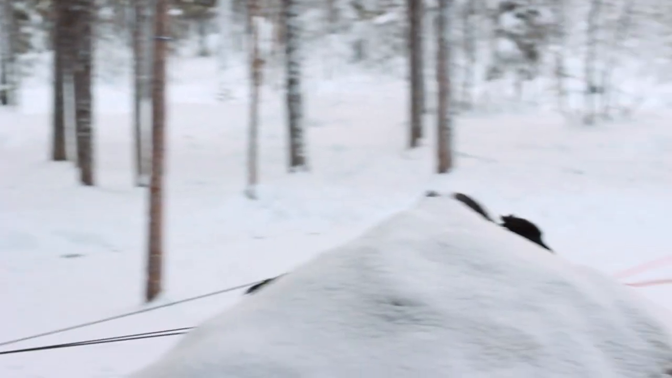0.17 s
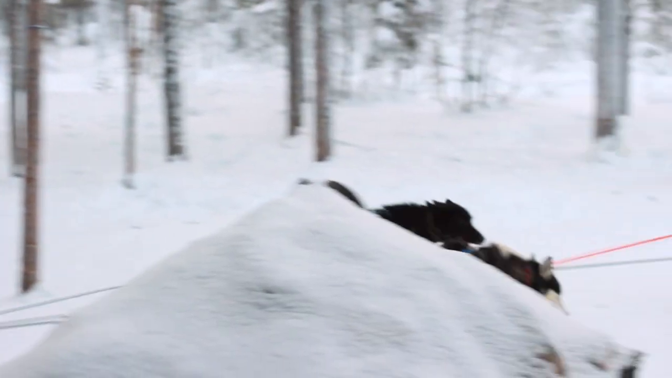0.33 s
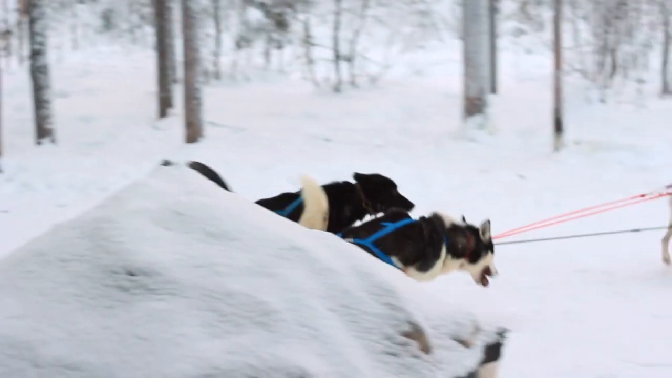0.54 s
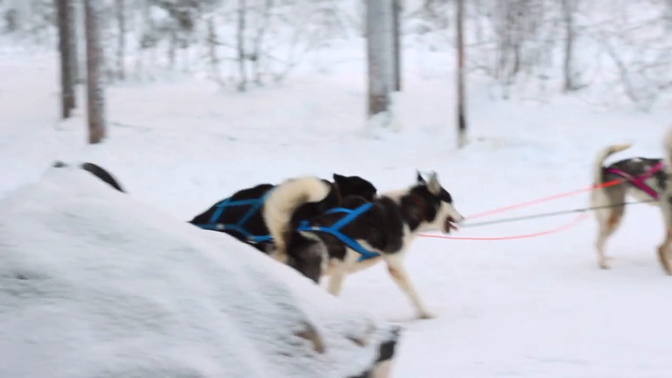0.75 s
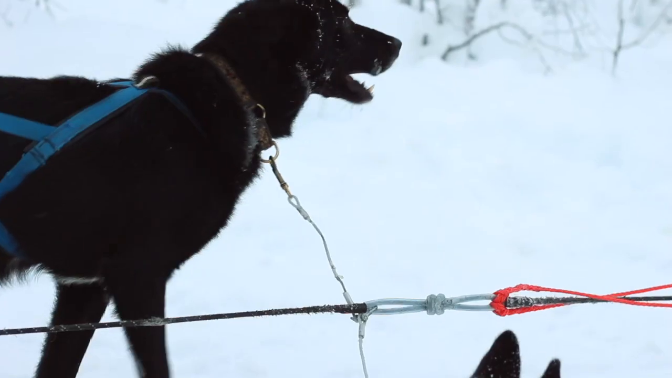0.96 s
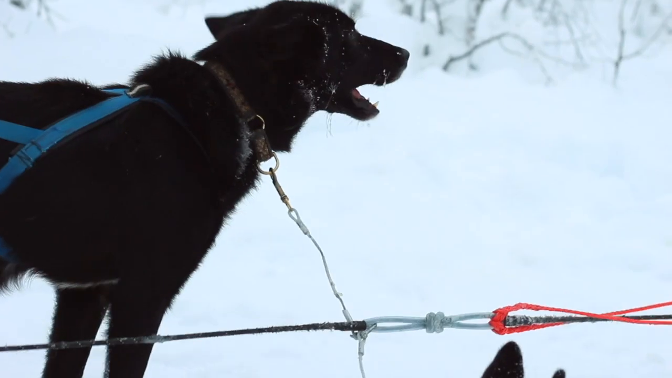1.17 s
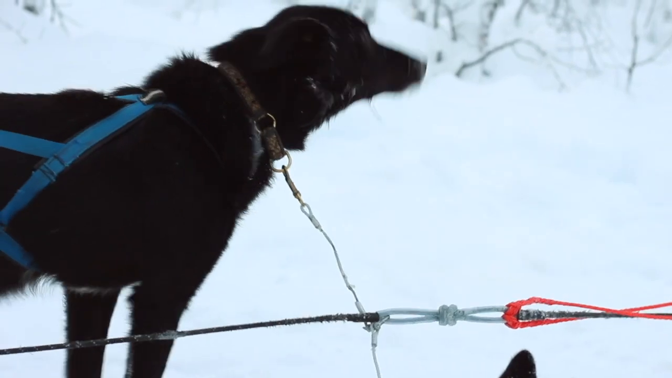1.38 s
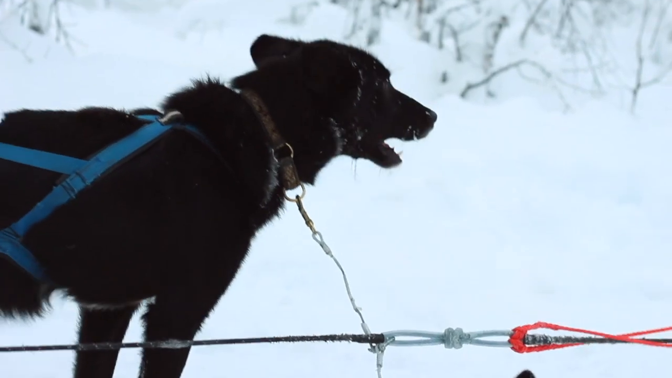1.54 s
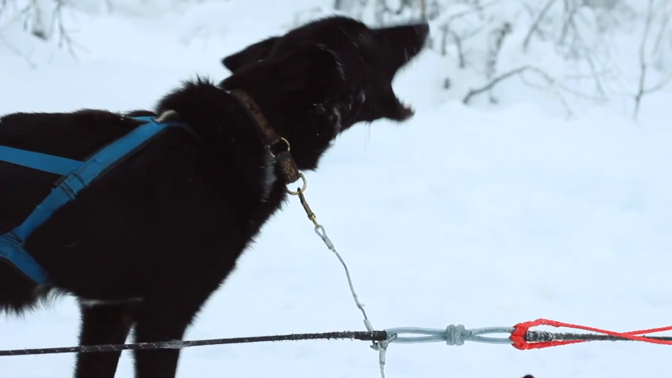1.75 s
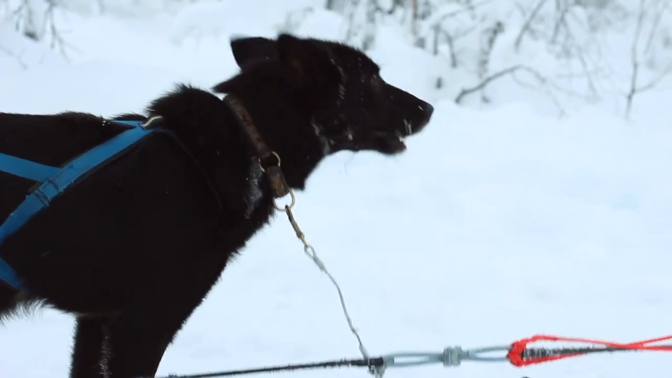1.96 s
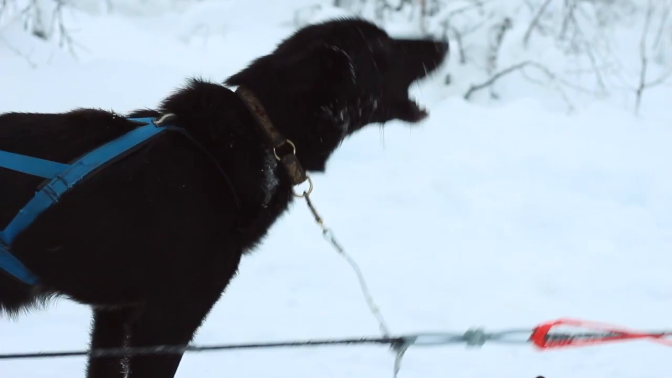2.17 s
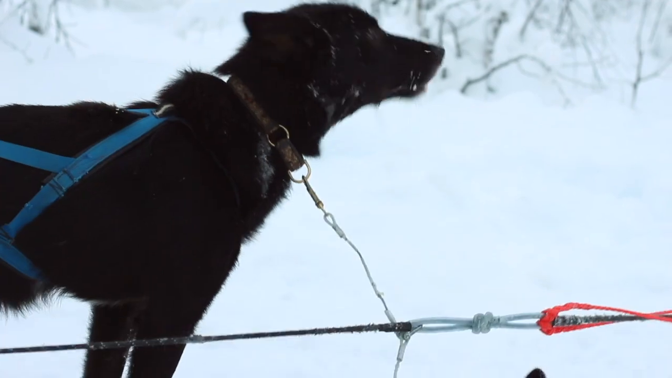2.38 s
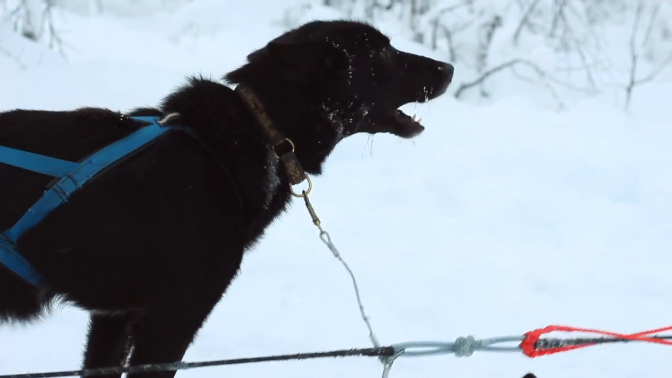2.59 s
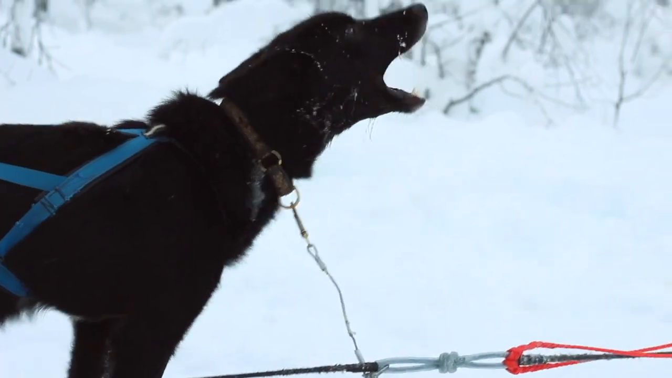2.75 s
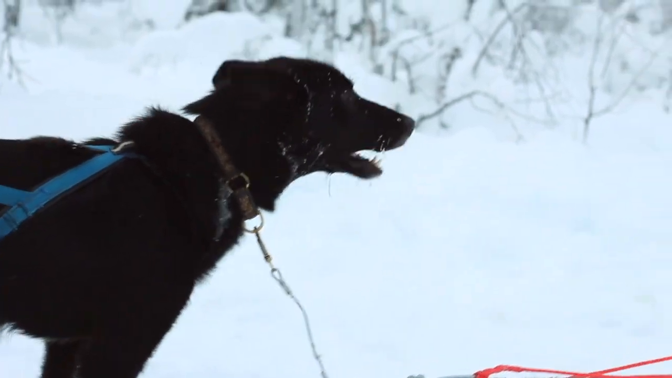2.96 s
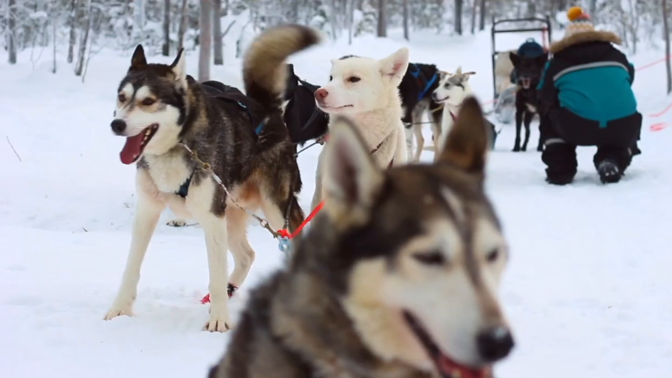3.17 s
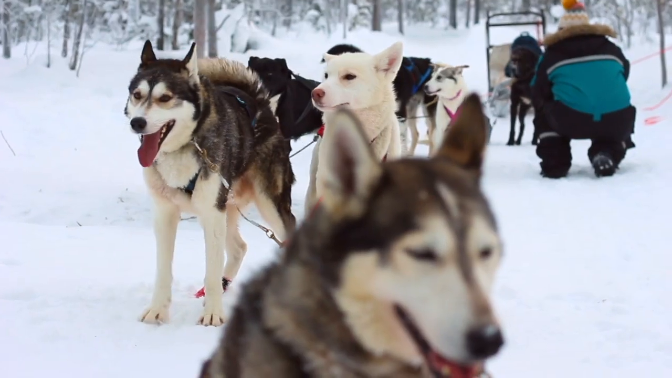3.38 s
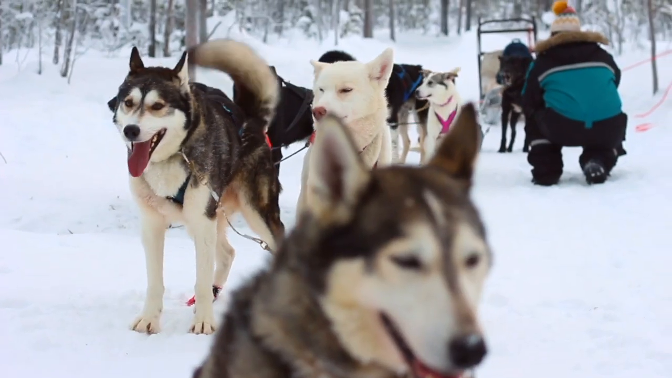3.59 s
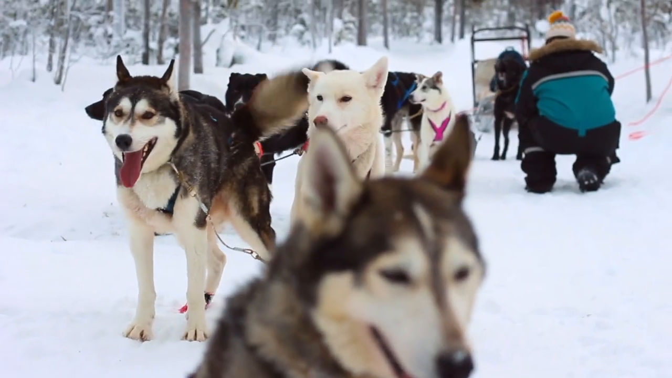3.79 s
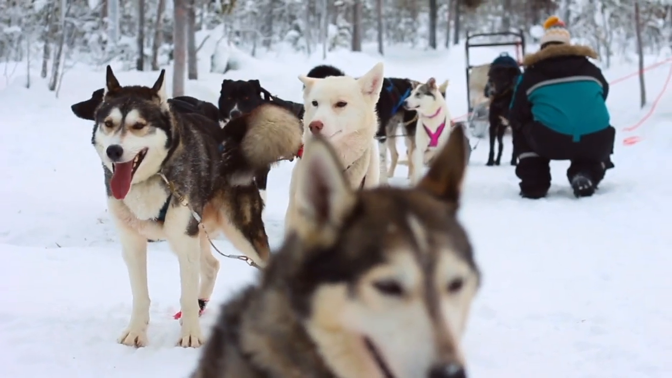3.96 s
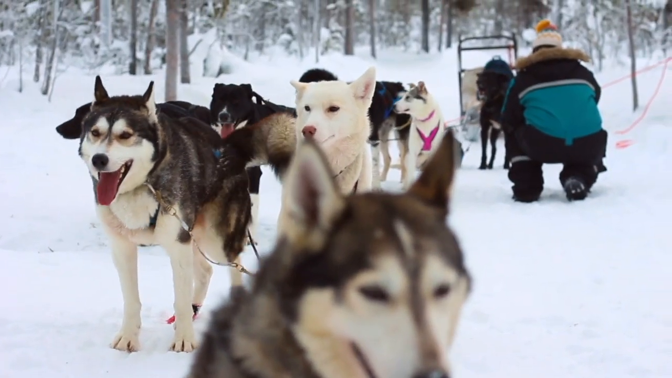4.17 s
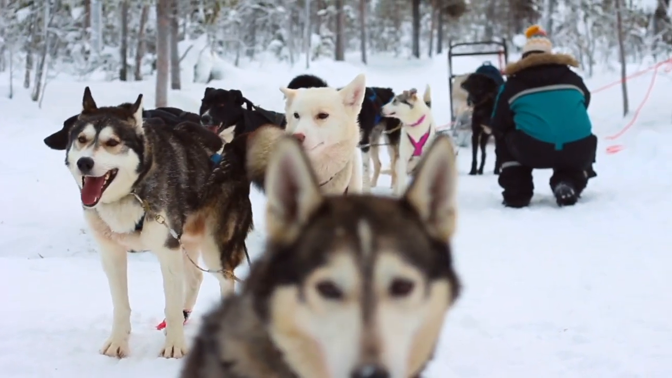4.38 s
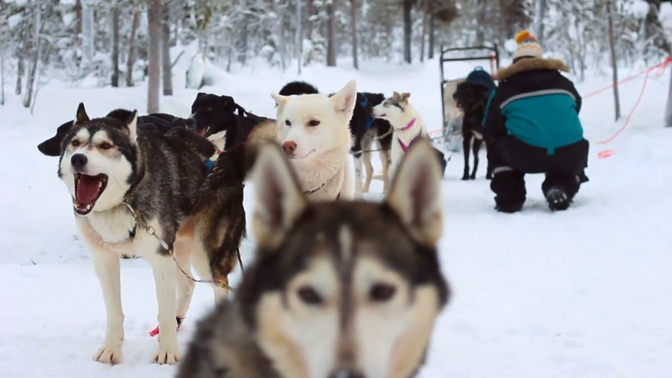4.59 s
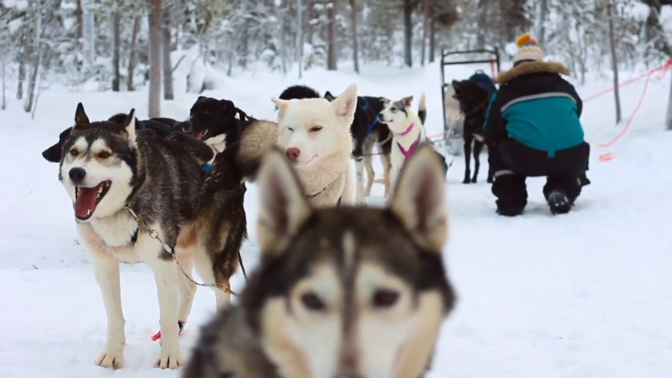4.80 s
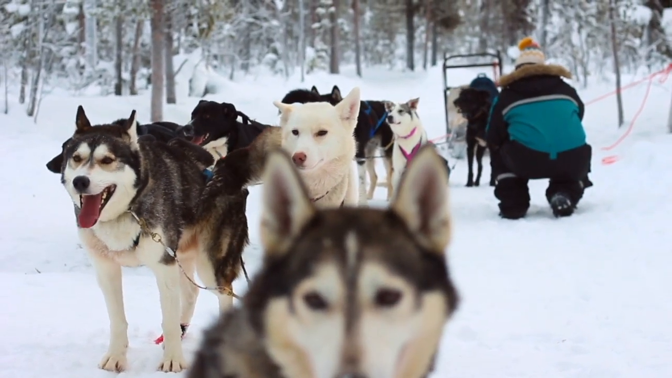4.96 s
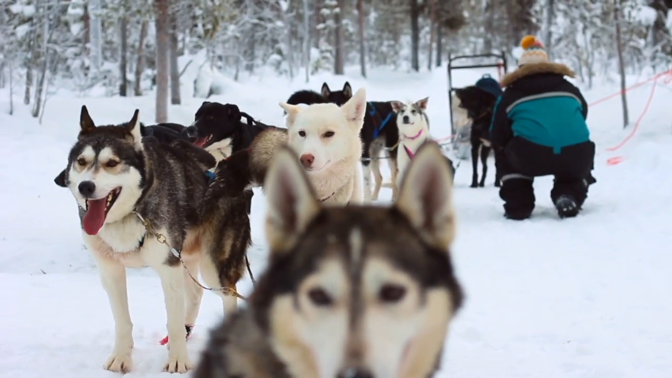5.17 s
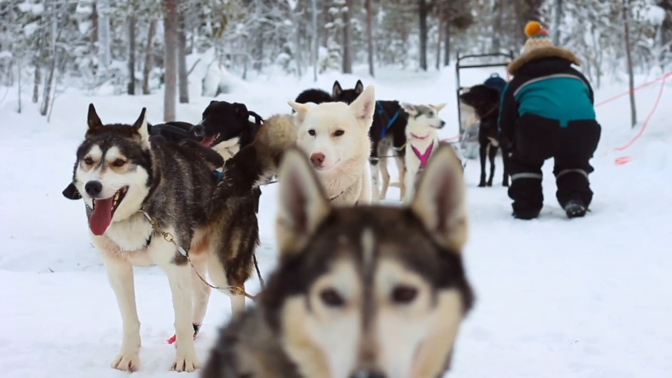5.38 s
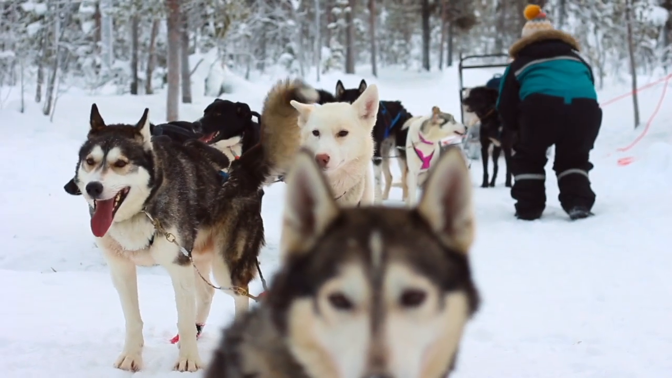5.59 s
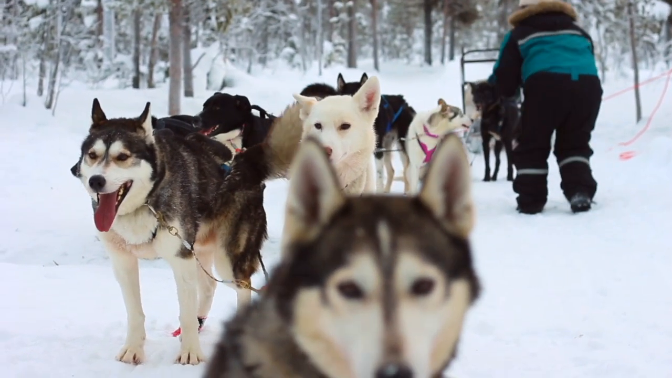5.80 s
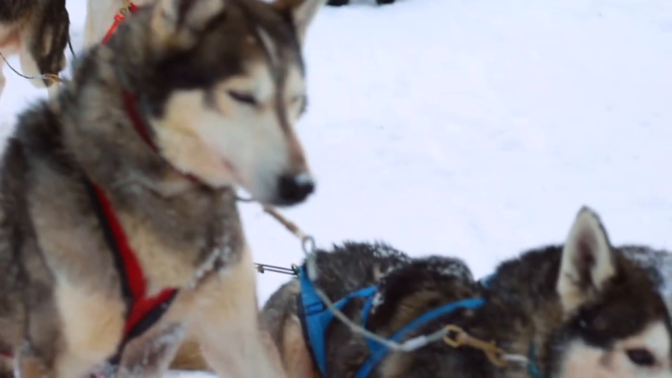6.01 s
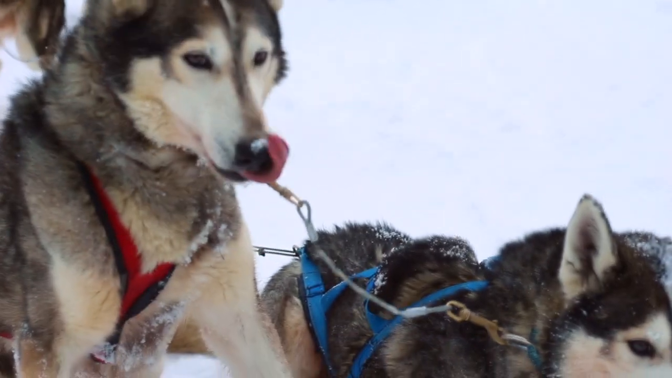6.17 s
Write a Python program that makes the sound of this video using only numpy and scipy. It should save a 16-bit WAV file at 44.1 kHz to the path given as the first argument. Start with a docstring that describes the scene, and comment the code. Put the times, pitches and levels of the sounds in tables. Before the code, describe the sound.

A sled dog barks loudly up close, then a hoarser dog barks farther off, with yips and thin whines outdoors in the snow.

```python
"""First come distant barks and thin whines, as a team of sled dogs trots past on crunching snow.
Then a black dog barks close by, and a hoarse dog down the line follows, with a yip and a yelp.
Each bark starts as slow throat creaks that speed up, then becomes a tone that rises and falls
as the jaw opens. Whines and panting fall between the barks, and the forest sends back a dull echo."""
import sys
import numpy as np
from scipy import signal
from scipy.fft import rfft, irfft
from scipy.io import wavfile
from scipy.ndimage import uniform_filter1d, map_coordinates

SR = 44100
rng = np.random.default_rng(int(sys.argv[2]) if len(sys.argv) > 2 else 0)


def transcribe(u):
    """Save the signal u as a 16-bit wav file named by the first command-line argument.

    u: samples, shape (n,) or (channels, n), limited to [-1, 1]; the rate is SR.
    q: integer samples, one column per channel.
    """
    v = np.clip(np.atleast_2d(u).T, -1, 1)
    q = np.round(v * 32767).astype(np.int16)
    wavfile.write(sys.argv[1], SR, q)


N = 275184
TIME = np.arange(N) / SR
TOP_HZ = 15750  # upper limit of the treble

# the black dog's barks (creak starts [s], jaw opens [s], voice ends [s], top pitch [Hz],
# creak against voice [dB], rasp against tone [dB], early voice break [0-1])
BLACK_BARKS = [(1.284, 1.336, 1.433, 603, -9.5, -14, 1.0), (1.768, 1.835, 1.913, 592, -10, -13.5, 0),
               (2.209, 2.278, 2.371, 602, -11, -15, .7), (2.69, 2.769, 2.868, 608, -12.5, -12.5, 0.08)]
# the hoarse dog's barks (creak starts [s], jaw opens [s], voice ends [s], surge peaks [s],
# creak against voice [dB], rasp against tone [dB])
HOARSE_BARKS = [(3.345, 3.377, 3.489, 3.446, -6, 4), (3.857, 3.884, 3.993, 3.948, -7, 4),
                (4.24, 4.342, 4.453, 4.382, -5, 11), (4.783, 4.812, 4.923, 4.872, -6, 5),
                (5.259, 5.289, 5.398, 5.346, -9, 4)]
# distant barks (creak starts [s], jaw opens [s], voice ends [s], top pitch [Hz], level [dB],
# rasp against tone [dB])
FAR_BARKS = [(0, .04, .1, 1080, -30, 0), (.08, .12, .25, 1010, -26.5, 7),
             (.596, .618, 0.74, 1000, -27.5, 7), (0.787, .81, 0.88, 1600, -45, 1),
             (0.913, 0.928, .968, 590, -27, 3), (0.964, 0.996, 1.05, 740, -35, 8),
             (3.205, 3.22, 3.275, 430, -53, 6), (3.29, 3.31, 3.35, 1350, -55, 0)]
# whines and squeals (time [s], length [s], starting pitch [Hz], glide [octaves], level [dB])
WHINES = [(.005, .05, 560, .1, -36), (.019, 0.058, 1210, 0.099, -37.5), (2.06, .17, 4150, .03, -72),
          (0.76, 0.041, 9900, -.25, -60.5), (1.108, .017, 790, -0.22, -46), (2.427, .074, 4300, -0.16, -71),
          (2.836, .15, 6500, -.08, -62.5), (3.041, 0.051, 5120, 0.042, -56),
          (4.329, 0.02, 6360, 0.0047, -44.5), (4.682, 0.042, 5780, 0.18, -33),
          (4.733, .048, 1130, 0.36, -38), (5.858, .018, 1205, 0.21, -45.5),
          (5.948, 0.074, 4580, -0.16, -57)]
# puffs of breath (time [s], level [dB])
PANTS = [(3.07, -59), (3.19, -60), (3.739, -60), (4.69, -40.5), (5.128, -67), (5.552, -60.5), (5.818, -54),
         (5.912, -52)]
# paws and sled runners come near and leave (nearest at [s], half length [s], level [dB])
TROTS = [(.55, .6, -53), (3.28, 0.25, -57)]
# single paws break the snow's crust (time [s], level [dB])
CRUNCHES = [(.264, -47), (.395, -52), (.73, -55)]
# moments when the whole sound dips briefly (time [s])
DIPS_S = [.962, 3.047, 5.884]

# how throat and mouth shape the sound, with the jaw closed or open (frequency [Hz], level [dB])
BLACK_CLOSED = [(60, -53), (250, -34), (400, -17.5), (570, 7), (720, -6.5), (1000, -7.5), (1300, -26),
                (1600, -10.5), (1900, -33), (2350, -18), (3000, -68), (6000, -56.5), (15000, -89)]
BLACK_OPEN = [(40, -42.5), (100, -27.5), (280, -7.5), (600, -0.5), (1000, -0.5), (1350, -3.5), (1900, -1),
              (2600, -12), (3200, -12), (4300, -17.5), (8000, -32), (15500, -47)]
HOARSE_CLOSED = [(80, -42), (400, -10.5), (560, -1), (750, -2.5), (1100, 0.5), (2300, -7), (3100, -34.5),
                 (5500, -30), (9000, -40.5), (15000, -73.5)]
HOARSE_OPEN = [(80, -61), (200, -32), (420, -22), (560, 5), (720, -0.5), (1500, -0.5), (2150, -7),
               (2600, -22.5), (3200, -32.5), (4300, -31.5), (4700, -38.5), (5300, -27), (6400, -42),
               (7000, -33), (8300, -48.5), (10000, -47), (15500, -60)]
FAR_THROAT = [(47, -68), (80, -38), (263, -25), (348, -19), (432, -26.5), (623, -2.5), (825, -10.5),
              (1070, -0.5), (1880, -15.5), (2330, -12.5), (5530, -38), (14000, -76)]
# where the hoarse dog's mouth rings (frequency [Hz])
MOUTH_RINGS_HZ = [2850, 3300, 4380, 5630, 9900]
# the mix of bass and treble in breath, snow and echo (frequency [Hz], level [dB])
PANT_COLOUR = [(150, -38), (570, -6), (1100, -7.5), (2200, -2), (4500, -20), (8300, -26.5), (12000, -48)]
SNOW_COLOUR = [(40, -51), (210, -17.5), (700, -8.5), (1100, -10), (1900, -11.5), (4000, -20), (8000, -37.5),
               (14000, -59.5)]
ECHO_COLOUR = [(100, -13), (500, -4), (900, 1.5), (1700, -1), (3000, -10), (6000, -6.5), (14000, -36)]
# each voice's partials: the pure tones at 1, 2, 3... times its pitch (level [dB])
BLACK_TONE = [-3.5, -23, -18, -29, -29.5]
HOARSE_TONE = [13, -9.5, -10.5, -27]
YIP_TONE = [-21.5, 0, -19, -36, -25, -25]
YELP_TONE = [2.5, -1, -1.5, -15, -30, -44, -48, -36.5]
FAR_TONE = [0, -11, -18]
# the hoarse dog's surge: partials at 1, 1.5, 2, 2.5 and 3 times its pitch (level [dB])
SURGE_TONE = [0, -5, -2, -3, -7]


def black_dog():
    """A long creak, then a loud, nearly pure tone that breaks as it ends."""
    return sum(bark(times, BLACK_CLOSED, BLACK_OPEN, BLACK_TONE, top_hz=hz, level_db=-6.5,
                    creak_db=creak, rasp_db=rasp, arch=.075, waver=.021, air=1.5, jitter=.16, limp=0,
                    swell_s=.02, release_s=.011, sag_db=1.17, speedup_s=.059, build_s=.012,
                    droop=.05, breaks=(early, .85))
               for *times, hz, creak, rasp, early in BLACK_BARKS)


def hoarse_dog(ring_db=-3.5, ring_width=.047):
    """Barks with more rasp than tone, ringing in the open mouth."""
    voice = sum(bark(times, HOARSE_CLOSED, HOARSE_OPEN, HOARSE_TONE, top_hz=590, level_db=-19.6,
                     creak_db=creak, rasp_db=rasp, arch=.074, waver=.021, air=1.53, jitter=.1,
                     limp=.38, swell_s=.016, release_s=.008, sag_db=1.5, speedup_s=.036,
                     build_s=.026, droop=.02, surge_s=surge_s, creak_hz=118)
                for *times, surge_s, creak, rasp in HOARSE_BARKS)
    edges = np.array([1 - ring_width / 2, 1 + ring_width / 2])
    rings = sum(band(voice, hz * edges, "bandpass", order=1) for hz in MOUTH_RINGS_HZ)
    return voice + undb(ring_db) * rings


def yip(times=(4.593, 4.639, 4.699)):
    """A short, bright call that rings on its second partial and falls away."""
    return bark(times, HOARSE_CLOSED, BLACK_OPEN, YIP_TONE, top_hz=504, level_db=-9.5,
                creak_db=-15, rasp_db=-16, arch=.06, waver=.007, air=1, jitter=.038, limp=.17,
                swell_s=.013, release_s=.014, sag_db=12, speedup_s=.033, droop=.14, droop_s=.017,
                fray_db=7)


def yelp(times=(6.052, 6.148, 6.2)):
    """A clean, level call rich in partials."""
    return bark(times, HOARSE_CLOSED, HOARSE_OPEN, YELP_TONE, top_hz=589.8, level_db=-18.5,
                creak_db=-20.5, rasp_db=-13, arch=.0243, waver=.0012, air=1, jitter=.11, limp=.17,
                swell_s=.014, release_s=.013, sag_db=1, speedup_s=.06, droop=.023)


def far_dogs():
    """Several distant throats, each at its own pitch."""
    return sum(bark(times, FAR_THROAT, FAR_THROAT, FAR_TONE, top_hz=hz, level_db=db,
                    creak_db=-4, rasp_db=rasp, arch=.19, waver=.025, air=1, jitter=.055, limp=.25,
                    swell_s=.016, release_s=.018, sag_db=5, speedup_s=.02, build_s=.016)
               for *times, hz, db, rasp in FAR_BARKS)


def bark(times, closed, opened, partials, top_hz, level_db, creak_db, rasp_db, arch, waver, air,
         jitter, limp, swell_s, release_s, sag_db, speedup_s, build_s=.018, droop=.04, droop_s=.012,
         breaks=(0, 0), break_hz=910, fray_db=3, surge_s=None, surge_db=.5, creak_hz=84):
    """One bark: a creak behind a closed jaw, an arching tone wrapped in rasp, then the throat shuts."""
    start_s, open_s, end_s = times
    t = np.arange(start_s, end_s + .047, 1 / SR)
    n = len(t)
    # the chest pushes hardest mid-bark; pitch and loudness sag to either side
    progress = np.clip((t - open_s) / (end_s - open_s), -.05, 1.3)
    slack = (2 * progress - .94) ** 2
    running_out = 1 - droop * ramp((t - end_s) / droop_s)  # the pitch droops as the air runs out
    bend = (1 - arch * slack) * running_out
    jaw = .5 + .5 * np.sin(np.clip((t - open_s) / swell_s, -np.pi / 2, np.pi / 2))
    buzz = vocal_folds(n, top_hz, air, jitter, limp, creak_hz, speedup_s)
    build = ramp(1.2 * ((t - start_s) / build_s - 1))
    creak = steady(colour(buzz, closed), samples=450) * build * (1 - jaw)
    # the throat's ringing rises and falls together with the pitch
    rasp = map_coordinates(steady(colour(buzz, opened)), [np.cumsum(bend)], order=3, mode="nearest")
    phase = 2 * np.pi * np.cumsum(top_hz * bend * (1 + waver * wander(n, 260))) / SR
    tone = unit(sum(undb(db) * np.sin((k + 1) * phase) * (1 + .45 * min(k, 1) * wander(n, 200))
                    for k, db in enumerate(partials)))
    # the voice is clearest at the top of the push and frays at both ends
    voice = tone + undb(rasp_db + fray_db * np.minimum(slack, 1) + 2.3 * wander(n, 80)) * rasp
    # pushed hard, it breaks into a harsh ring just after the jaw opens and just before the end
    broken = breaks[0] * hump(t, open_s + .027, .019) + breaks[1] * hump(t, end_s - .009, .0065)
    ring = steady(band(buzz, [break_hz / 1.54, break_hz * 1.084], "bandpass"), samples=200)
    voice = steady(voice + broken * (.75 * ring - .5 * tone), samples=350)
    if surge_s:
        # one hard push makes the wave repeat half as often, adding tones between the partials
        doubled = unit(sum(undb(db) * np.sin((k + 2) / 2 * phase) * (1 + wander(n, 120) / 2)
                           for k, db in enumerate(SURGE_TONE)))
        push = hump(t, surge_s, .018)
        voice = voice * (1 - push / 5) + undb(surge_db) * push * doubled
    call = undb(creak_db) * creak + jaw * undb(-sag_db * slack) * voice
    shutting = ramp((end_s - t) / release_s)
    out = np.zeros(N)
    add(out, start_s, undb(level_db) * shutting * call)
    return out


def vocal_folds(n, top_hz, air, jitter, limp, creak_hz, speedup_s):
    """Folds in the throat slap together faster and faster, each time letting out a puff of air."""
    rate_hz = np.minimum(creak_hz * np.exp(np.arange(n) / SR / speedup_s), top_hz)
    cycles = np.cumsum(rate_hz * (1 + jitter * wander(n, 400))) / SR  # jitter: uneven timing
    hits = np.flatnonzero(np.diff(np.floor(cycles), prepend=-1) > 0)
    by_turns = 1 + limp * (-1) ** np.arange(len(hits))  # strong, weak, strong, weak
    slaps = np.zeros(n)
    slaps[hits] = undb(2.5 * rng.standard_normal(len(hits))) * by_turns
    puff_fades = signal.lfilter([1], [1, -np.exp(-1 / (.0014 * SR))], slaps)
    return unit(slaps) + air * unit(puff_fades * rng.standard_normal(n))


def whines(octave_db=-26):
    """Short, quavering whistles through the nose."""
    out = np.zeros(N)
    for s, length_s, start_hz, glide, db in WHINES:
        n = int(length_s * SR)
        quaver = 1 + .014 * wander(n, 600)
        phase = 2 * np.pi * np.cumsum(start_hz * 2 ** np.linspace(0, glide, n) * quaver) / SR
        octave = undb(octave_db) * (2 * start_hz < TOP_HZ) * np.sin(2 * phase)
        add(out, s, undb(db) * unit(np.hanning(n) * (np.sin(phase) + octave)))
    return out


def panting(puff_s=.078):
    """Soft, fluttering puffs from a dog's open mouth."""
    out, n = np.zeros(N), int(puff_s * SR)
    for s, db in PANTS:
        puff = colour(rng.standard_normal(n) * undb(2.6 * wander(n, 180)), PANT_COLOUR)
        add(out, s, undb(db) * unit(puff * np.sin(np.linspace(0, np.pi, n))))
    return out


def snow(grain_db=4, tread_db=2.5, shuffle_db=-70, crunch_hz=2800):
    """Cold snow crunches in tiny grains under paws and runners; waiting dogs never stand quite still."""
    grains = rng.standard_normal(N) * undb(grain_db * wander(N, 700) + tread_db * wander(N, 20))
    crust = unit(colour(grains, SNOW_COLOUR))
    bustle = undb(shuffle_db) + sum(undb(db) * hump(TIME, s, half_s) for s, half_s, db in TROTS)
    steps = sum(undb(db) * hump(TIME, s, .006) for s, db in CRUNCHES)
    return crust * bustle + unit(band(crust, crunch_hz, "highpass")) * steps


def forest(x, pan_db, near_db, echo_db, near_fade_s=.21, echo_fade_s=.62, treble_hz=3000):
    """Snow banks and sleds echo at once, the tree trunks later and duller."""
    dull = colour(x, ECHO_COLOUR)
    shared_echo = scatter(dull, echo_fade_s, .031)
    out = []
    for side in (1, -1):  # left, right
        # as heads swing, the treble reaches each side by changing paths
        swing = 2 * wander(N, 6)
        paths = np.cos(swing) * scatter(x, .012, 0) + np.sin(swing) * scatter(x, .012, 0)
        treble = undb(.5) * band(paths, treble_hz, "highpass")
        direct = colour(x + treble, [(treble_hz / 2, 0), (2 * treble_hz, -2.4 - 1.1 * side)])
        near = undb(near_db) * band(scatter(x, near_fade_s, .0017), 250, "highpass", order=1)
        far = undb(echo_db) * (shared_echo + .78 * scatter(dull, echo_fade_s, .018))
        out.append((direct + near) * undb(side * pan_db / 2) + far)
    return np.array(out)


def scatter(x, fade_s, delay_s):
    """A cloud of tiny echoes that starts after delay_s and falls by 60 dB in fade_s."""
    t = TIME[:SR]
    cloud = rng.standard_normal(SR) * undb(-60 * t / fade_s) * (t > delay_s)
    return signal.oaconvolve(x, cloud / np.linalg.norm(cloud))[:N]


def colour(x, points):
    """Shape bass and treble along a curve of (frequency [Hz], level [dB]) points."""
    hz, db = np.transpose(points)
    grid_hz = np.maximum(np.fft.rfftfreq(2048, 1 / SR), 1)
    cepstrum = irfft(np.log(undb(np.interp(np.log(grid_hz), np.log(hz), db))))
    # make the filter ring only after a sound, never before it
    cepstrum[1:1024] *= 2
    cepstrum[1025:] = 0
    return signal.fftconvolve(x, irfft(np.exp(rfft(cepstrum))))[:len(x)]


def band(x, hz, kind, order=2):
    """Let only part of the frequency range through."""
    return signal.sosfilt(signal.butter(order, hz, kind, fs=SR, output="sos"), x)


def steady(x, samples=600):
    """Even out the loudness but keep the single pulses."""
    power = uniform_filter1d(uniform_filter1d(x ** 2, samples), samples)
    return x / np.sqrt(np.abs(power) + 1e-14)


def wander(n, rate_hz):
    """A smooth random wobble with a spread near 1."""
    place = np.arange(n) * rate_hz / SR
    return map_coordinates(rng.standard_normal(int(place[-1]) + 2), [place], order=3, mode="nearest")


def hump(t, middle_s, half_s):
    """A bell-shaped swell of height 1."""
    return np.exp(-((t - middle_s) / half_s) ** 2)


def ramp(x):
    """A soft step from 0 to 1 around x = 0."""
    return .5 + .5 * np.tanh(x)


def undb(db):
    """Turn decibels into a number to multiply by."""
    return 10 ** (np.asarray(db) / 20)


def unit(x):
    """Scale a sound to an average power of 1."""
    return x / np.sqrt(np.mean(x ** 2) + 1e-18)


def add(track, start_s, x):
    """Mix a sound in at its time."""
    i = max(int(start_s * SR), 0)
    track[i:i + len(x)] += x[:N - i]


def scene():
    """The dogs in their places among the trees; the level dips briefly three times."""
    distant = forest(far_dogs() + snow(), pan_db=-1, near_db=-6, echo_db=-17.5)
    close = forest(black_dog(), pan_db=-.8, near_db=-14.5, echo_db=-24.5)
    close *= TIME < DIPS_S[1]  # the black dog's echo stops at the second dip
    down_the_line = hoarse_dog() + yip() + yelp() + whines() + panting()
    out = distant + close + forest(down_the_line, pan_db=-3, near_db=-8.5, echo_db=-23)
    for s in DIPS_S:
        out *= 1 - .97 * ramp((TIME - s + .006) / .001) * ramp((s + .018 - TIME) / .01)
    return out


def record(dry, ceiling=.87, rumble_hz=108):
    """Round off the loudest peaks, thin the rumble and cut the highest treble."""
    rounded = dry / (1 + (dry / ceiling) ** 8) ** (1 / 8)
    thinned = band(rounded, rumble_hz, "highpass")
    return signal.sosfilt(signal.ellip(8, .2, 70, TOP_HZ, fs=SR, output="sos"), thinned)


dry = scene()
out = record(dry)
transcribe(out)
```